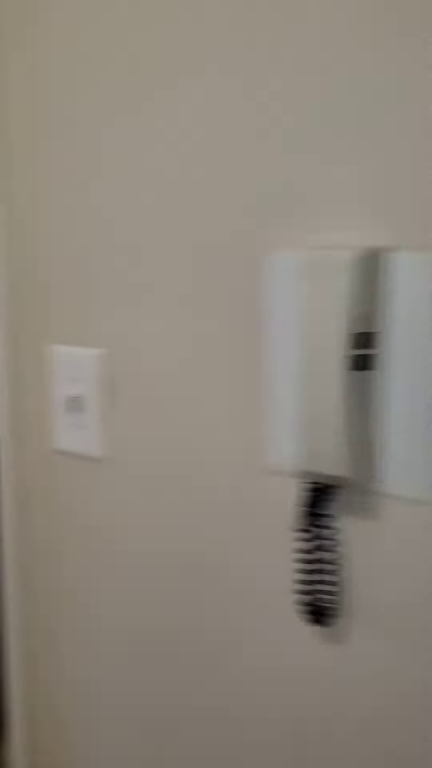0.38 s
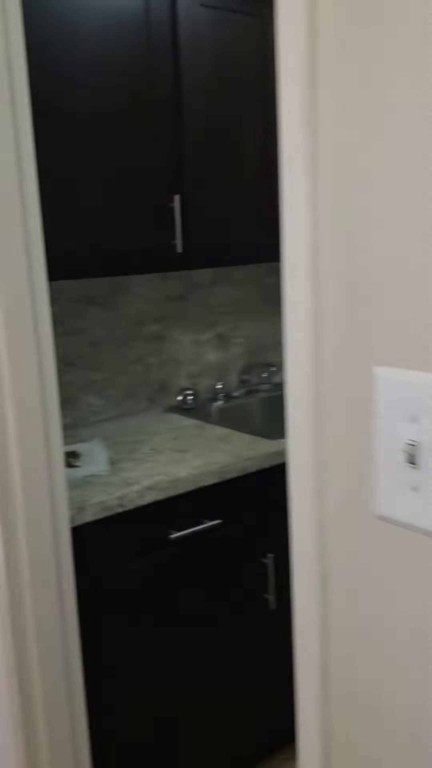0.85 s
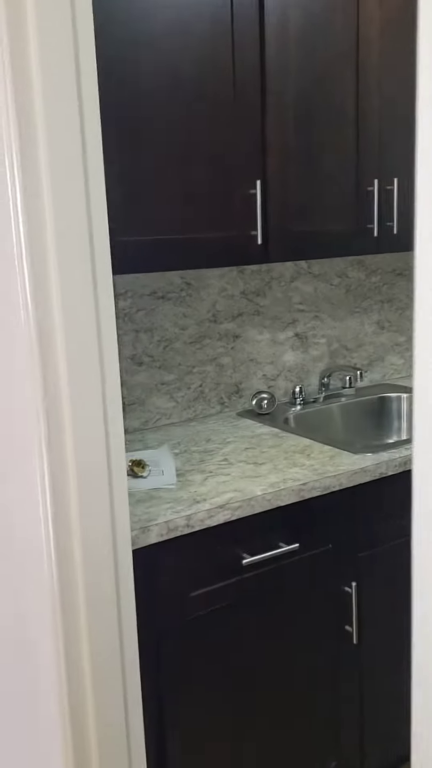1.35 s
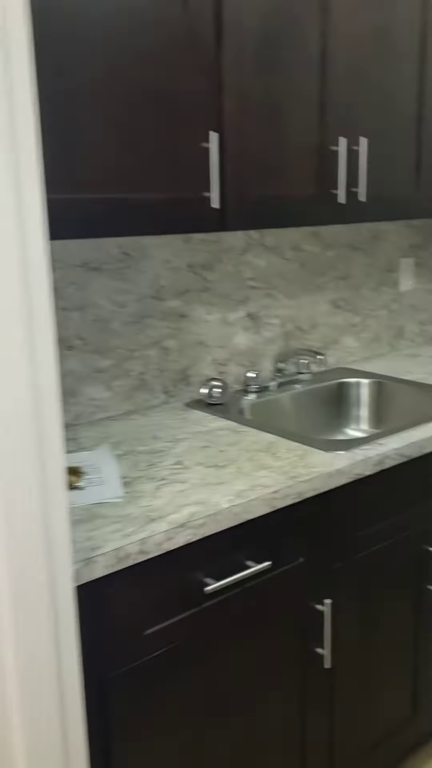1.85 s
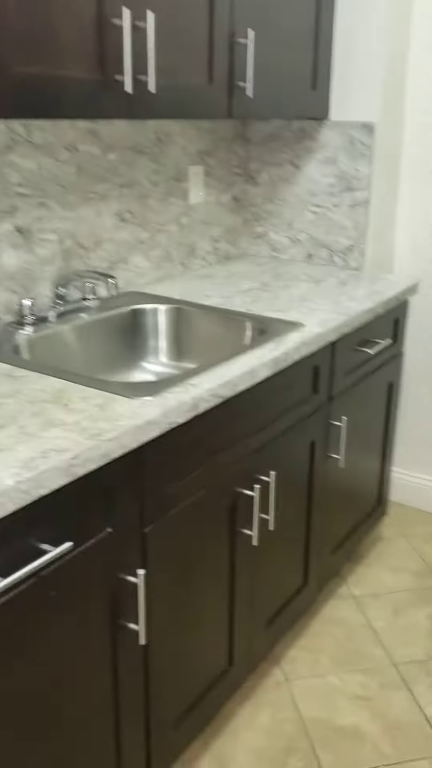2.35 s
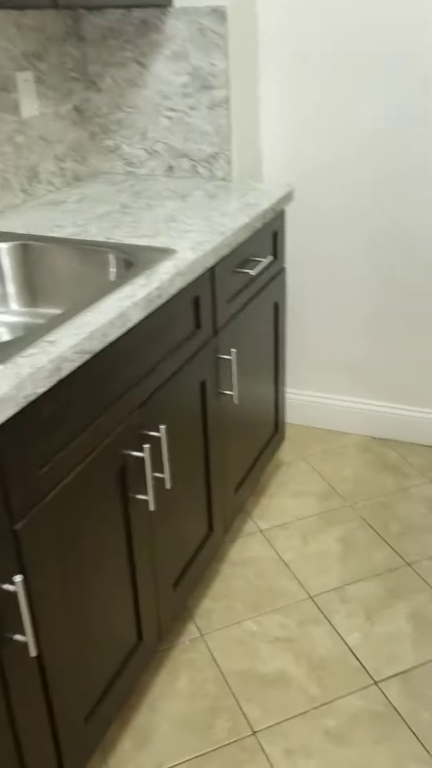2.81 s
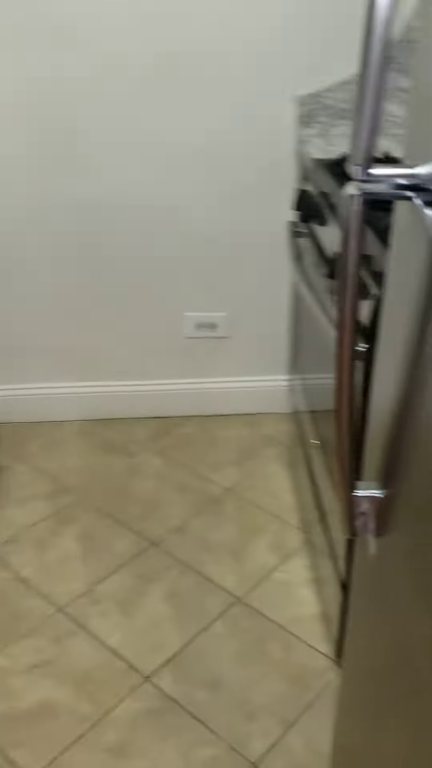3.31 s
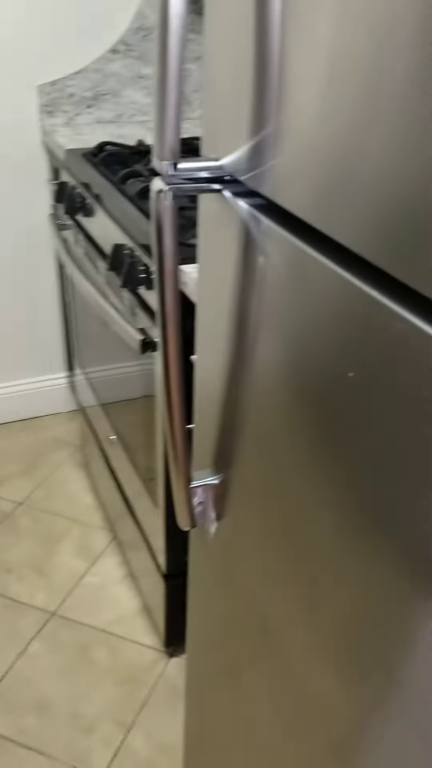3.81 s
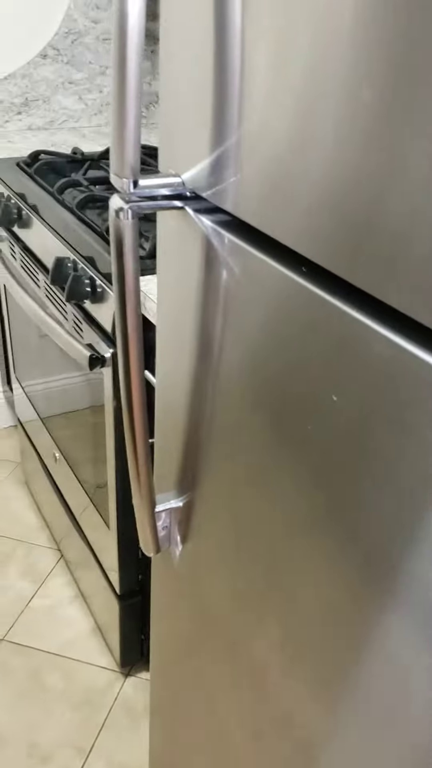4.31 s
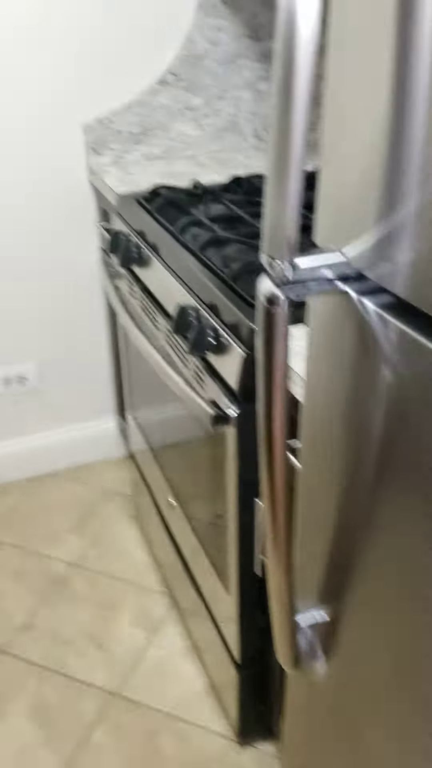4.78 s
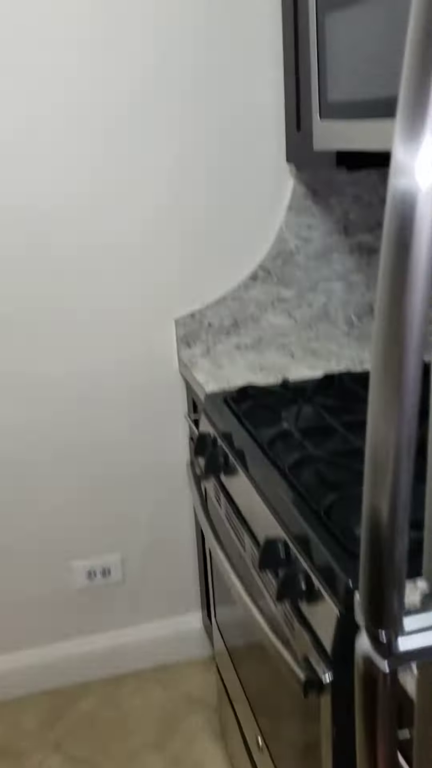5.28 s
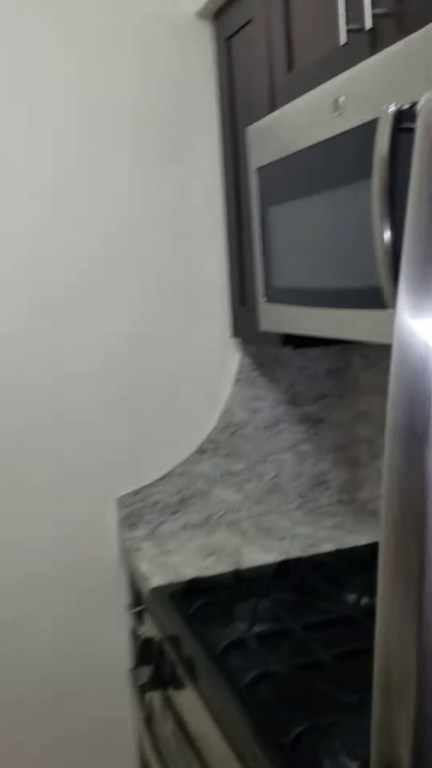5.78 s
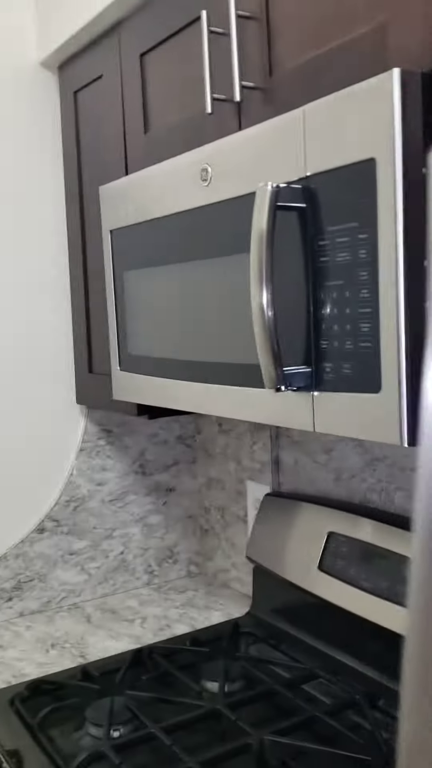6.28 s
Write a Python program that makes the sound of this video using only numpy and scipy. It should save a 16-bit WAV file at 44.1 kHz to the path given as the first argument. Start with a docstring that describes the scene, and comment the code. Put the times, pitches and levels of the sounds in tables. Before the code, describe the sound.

A handheld stereo recorder is carried through a bare, hard-walled flat. From 0 to 1 second there is low room rumble, a fridge hum, airy clothes swishes, faint shoe ticks and one soft heel thump near 0.5. At about 1.1 a metal latch clacks rapidly with a splintery crack; at 1.25 to 1.3 a hollow wooden door slams, by far the loudest event, boomy and sharp, with small rebounds until 1.4. The rooms ring for roughly a second. Between 1.5 and 3.7 the background sinks, with a tiny tick near 1.9, rustles from 2.4 and a soft step at 3.0. From 3.5 the low mains hum and unsteady fan drone swell, strongest around 4 to 5. Muffled heel thumps fall at 4.2, 4.6 and 5.7 amid cloth rustling and scrapes. Faint finger knocks at 4.8 and 6.1 lead to sharp, close, left-sided clicks at 6.3.

```python
"""A hollow closet door latches and thuds shut in a bare, hard-walled flat; the rooms ring for a second.
Metal and panel are dying tones, cracks are noise bursts, and the rooms are fading noise tails.
A walker with a hand-held two-port recorder then steps into the kitchen, where a fridge hums louder:
steady tones, wavering tones and narrow noise. Shoes tick and thump softly as filtered noise and low tones,
clothes rustle as swelling noise, and fingers pop and click on the recorder's case as short rings."""
import sys
import numpy as np
from scipy import signal
from scipy.fft import rfft, irfft, next_fast_len
from scipy.io import wavfile
from scipy.ndimage import uniform_filter1d

SR = 44100
rng = np.random.default_rng(int(sys.argv[2]) if len(sys.argv) > 2 else 0)


def elevation(decibels):
    """Turn decibel levels (scalar or array-like) into linear amplitude ratios."""
    levels = np.asarray(decibels, float)
    return 10 ** (levels / 20)


def waveform_to_disk(signal):
    """Save audio, clipped to [-1, 1], as 16-bit WAV at the path in sys.argv[1]."""
    frames = np.transpose(np.atleast_2d(signal))
    scaled = np.clip(frames, -1, 1) * 32767
    samples = np.round(scaled).astype(np.int16)
    wavfile.write(sys.argv[1], SR, samples)


N = 281799  # length in samples

# Levels in the tables are relative: each layer is scaled again where it is mixed.
# low rumble, middle room air and high rustle, as spectra: pitch_hz, level_db (per Hz)
RUMBLE_SPECTRUM = [(15, -28), (30, -25.5), (62, 2.5), (90, -2.5), (120, -2), (170, -4.5), (230, -6.5),
                   (320, -10.5), (420, -20), (700, -33), (1500, -74.5)]
MIDS_SPECTRUM = [(250, -12.5), (450, 6.5), (700, -0.5), (1000, -10.5), (1600, -5.5), (2300, -14),
                 (3300, -18.5), (5000, -32)]
RUSTLE_SPECTRUM = [(1470, -30.5), (2500, -7.5), (2810, -5.5), (3320, -15.5), (3980, -3), (4740, -7),
                   (5820, 2), (7260, -15.5), (9490, -15.5), (10900, -10.5), (15100, -16), (16000, -22),
                   (16500, -38)]
RUMBLE_DB, MIDS_DB, RUSTLE_DB = -50.5, -65.5, -72.5  # resting levels
# the background sinks after the thud and comes back
LULL_RUMBLE_DB, LULL_MIDS_DB, LULL_RUSTLE_DB = -4.5, -6.5, -4
LULL_FROM_S, LULL_UNTIL_S, RETURN_S = 1.5, 3.74, 0.45
# clothes swishing as the walker turns and strides: middle_s, length_s, lift_db (in full for the rustle)
SWISHES = [(0.122, 0.45, 7.5), (0.66, 1, 8), (2.647, 0.82, 8.5), (3.219, 0.34, 3), (3.722, 0.41, 6),
           (4.27, 0.24, 6.5), (4.655, 0.98, 6.5), (5.05, 0.5, 2), (5.405, 0.47, 9), (5.863, 0.63, 4.5)]
SWISH_IN_MIDS, SWISH_IN_RUMBLE = 0.47, 0.13  # share of a swish's dB that reaches the lower layers

# fridge heard from the walker's path: time_s, hum_db, drone_db
FRIDGE_PATH = [(0.0, -52, -59.5), (0.63, -49, -56), (1.05, -60.5, -64.5), (2.3, -58.5, -80),
               (2.5, -55.5, -59.5), (3.0, -50, -64.5), (3.35, -51, -50.5), (3.6, -49.5, -55),
               (4.0, -43, -48), (4.87, -43.5, -46.5), (5.3, -47, -43.5), (6.0, -48.5, -44),
               (6.39, -46.5, -49)]
# bearing of the fridge as the walker turns: time_s, left_over_right_db
FRIDGE_PAN = [(0, -2.5), (2.5, -1.5), (4.0, -1), (5.1, -5), (5.7, -1.5), (6.39, 4)]
# steady mains tones: pitch_hz, level_db
HUM_TONES = [(120.3, -2.5), (240.6, -19.5), (360.9, -19), (481.2, -41)]
# fan noise in narrow cabinet resonances: pitch_hz, width_hz, level_db
DRONE_BANDS = [(165, 14, -6.5), (235.7, 25, -9), (269.7, 31, -1), (296.6, 3.3, -8), (490, 16, -15)]
# wavering fan tones: pitch_hz, level_db
FAN_TONES = [(236, -8.5), (270.5, -2), (486, -27.5)]

# fingers shifting on the case near the left port: start_s, level_db, snap_db (over the case ring)
FINGERS = [(3.505, -55, -17), (4.806, -44, -34), (4.892, -44.5, -54), (6.103, -50, -38),
           (6.145, -41.5, -30), (6.192, -48, -25), (6.234, -40, -33), (6.275, -46, -35),
           (6.2988, -25.5, 8.5), (6.3041, -31.5, 8), (6.3108, -31.5, 8.5)]
# hollow ring of the case, then the sharp snap of the skin: pitch_hz, level_db, t60_s
CASE_RING = [(325, -3.5, 0.01), (512, 5, 0.015), (720, -1, 0.0087)]
SNAP_RING = [(1000, -5.5, 0.0036), (1790, -3, 0.003), (2940, -2.5, 0.0067), (4650, -3.5, 0.0039),
             (7000, -4, 0.00093), (11000, -11.5, 0.0053)]
CASE_LAG_S = 0.0014  # the shell answers just after the snap

# shoes and floor ticking: start_s, level_db, pitch_hz, width_hz, scrape_s (time to fall 30 dB)
TICKS = [(.258, -56.5, 3150, 1500, 0.0055), (.285, -42, 2320, 7000, 0.031), (0.493, -51, 5470, 202, 0.03),
         (0.587, -44, 5160, 9700, 0.027), (0.7561, -45, 2100, 2450, 0.015),
         (1.041, -50.5, 5600, 1000, 0.0065), (1.927, -41, 11000, 8560, 0.0025),
         (3.079, -58, 600, 502, 0.02), (3.759, -53, 600, 660, 0.18), (4.208, -63, 9700, 5160, 0.12),
         (4.622, -61.5, 8000, 7950, 0.2), (4.69, -50.5, 600, 1620, 0.047),
         (4.777, -47.5, 7000, 8100, 0.0033), (5.289, -52.5, 1860, 940, 0.013),
         (5.433, -46, 11000, 3880, 0.088), (5.745, -56, 6500, 7000, 0.19), (5.78, -57.5, 2200, 900, 0.041)]
# soft heel thumps: start_s, level_db, pitch_hz
STEPS = [(0.486, -40.5, 168), (3.038, -46, 169), (4.169, -40, 172), (4.59, -37, 159), (4.659, -38, 195.5),
         (5.709, -44, 149)]

# how long the rooms ring: pitch_hz, t60_s
ROOM_T60 = [(60, 1.2), (200, 0.82), (500, 1.396), (1000, 1.4), (2000, 1.08), (3100, 1.07), (5000, 0.82),
            (8000, 0.7), (12000, 0.27)]
# tone of the room tails as they begin: pitch_hz, level_db
ROOM_COLOUR = [(40, -19.5), (80, -9.5), (130, -6), (250, -1.5), (400, 5.5), (1000, 2), (3000, 1),
               (6000, -2), (9000, -8.5), (15000, 2)]
# left-right likeness of noise, then of the room tails: pitch_hz, likeness (0 unlike, 1 the same)
NOISE_LIKENESS = [(60, 0.51), (130, 0.67), (290, .8), (640, 0.21), (1400, 0.014), (15000, .01)]
ROOM_LIKENESS = [(60, .8), (130, 1), (290, 0.43), (640, 0.17), (1400, .02), (15000, .01)]
# colour of the left port over the right, for the walker's side, then the door's side: pitch_hz, balance_db
WALKER_PORTS = [(60, 8), (110, 1), (200, 3.5), (380, 2), (700, 3.5), (1290, 6), (2380, 7.5), (4400, -2.5),
                (8120, -7.5), (15000, 2)]
DOOR_PORTS = [(60, -1), (110, 4.5), (200, -0.5), (380, 1), (700, 4.5), (1290, 0.5), (2380, 3.5),
              (4400, -2.5), (8120, -5.5), (15000, -1)]

# wood and frame cracking as they meet: start_s, level_db, rise_s, t60_s
CRACKS = [(1.0946, -31.5, 0.0018, 0.22), (1.256, -47.5, 0.0032, 0.45), (1.261, -27, 0.0029, 0.13),
          (1.2793, -18, 0.00037, 0.036), (1.284, -12.5, .001, 0.024)]
# tone of a crack: pitch_hz, level_db (per Hz)
CRACK_SPECTRUM = [(300, -5), (700, -2.5), (1200, 1.5), (1800, 3.5), (2600, -6), (3150, -1.5), (3600, -9),
                  (5300, -5.5), (6500, -13), (7800, -19.5), (11000, -22.5), (15500, -31.5)]
# latch tongue and strike plate meeting: start_s, level_db, brightness_db
LATCH_HITS = [(1.0944, -12, -26), (1.1003, -12.5, -33.5), (1.1052, -18, -18), (1.111, -14.5, -23),
              (1.117, -22.5, -20.5), (1.2448, -22, 6), (1.2715, -27.5, 7), (1.2802, -11.5, -2.5)]
# rings of the latch, then of its smaller, brighter parts: pitch_hz, level_db, t60_s
LATCH_RING = [(723, -8, 0.016), (2520, -0.5, 0.0094), (2910, -3.5, 0.0022), (3980, -21, 0.0055),
              (5600, -6.5, 0.0025)]
LATCH_BRIGHT_RING = [(7160, -6.5, .0015), (11000, -1.5, 0.0039), (14300, 1.5, .0012)]
# the door still free on its hinges, knocked by the latch and stopped by the frame: pitch_hz, level_db, t60_s
FREE_DOOR_RING = [(80.4, -28, 2.4), (150, -35.5, 0.32), (172, -37, .4), (240, -32, 0.57), (394, -42.5, 0.4),
                  (568, -39.5, 0.51), (737, -41.5, 0.08)]
FREE_FROM_S, FREE_UNTIL_S = 1.096, 1.3
# panel pushed against its frame and springing back: start_s, level_db, contact_ms, direction (1 or -1)
BLOWS = [(1.2652, -10, 4.2, 1), (1.2699, -14, 3, -1), (1.273, -2, 1.996, -1), (1.276, 0.5, 6., 1),
         (1.2913, -10, 4.5, -1), (1.326, -10.5, 3.36, 1), (1.348, -10.5, 3.64, -1), (1.372, -15.5, 2.62, 1)]
# door shut in its frame, with the closet air: pitch_hz, level_db, t60_s
PANEL_RING = [(45, -17.5, 0.54), (55, -12.5, 0.27), (79.6, -9.5, 0.49), (103, 1, 0.09), (119.6, -4.5, 0.24),
              (138.24, -5, 0.72), (159.65, -10, 0.77), (184, -12, 0.45), (207.2, -4, 0.53),
              (241, -7.5, 0.2), (317, -13, 0.32), (360.5, -14, 0.21), (453, -24.5, 0.21), (501, -19, 0.15),
              (600, -16, 0.23), (920, -28, .1)]


def evened(x):
    """Scales to rms 1."""
    return x / np.sqrt(np.mean(x ** 2) + 1e-20)


def read(points, hz):
    """Reads a spectrum on a log-frequency axis."""
    f, value = np.transpose(points)
    return np.interp(np.log(hz + 1), np.log(f + 1), value)


def add(mix, s, sound):
    """Mixes a sound in at time s."""
    part = mix[round(s * SR):][:len(sound)]
    part += sound[:len(part)]


def curves(rows):
    """Turns each dB column into a gain at every sample."""
    s, *columns = np.transpose(rows)
    return [elevation(np.interp(np.arange(N) / SR, s, column)) for column in columns]


def ring(modes, size):
    """Dying tones after one tap; neighbouring tones start in opposite directions."""
    t = np.arange(size) / SR
    out = np.zeros(size)
    for k, (hz, db, t60) in enumerate(modes):
        out += (-1) ** k * elevation(db - 60 * t / t60) * np.sin(2 * np.pi * hz * t)
    return out


def resonate(x, hz, width):
    """A resonance built from two poles around hz, with a gain of about 1 at its peak."""
    pole = np.exp((2j * np.pi * hz - np.pi * width) / SR)
    return 2 * signal.lfilter([1 - abs(pole)], [1, -pole], x).real


def noise(shape_db, size, length, patchy_db, likeness=NOISE_LIKENESS):
    """Two ports of random short-time spectra; shape_db(hz, t) sets the level, drifting patches roughen it."""
    hz = np.fft.rfftfreq(size, 1 / SR)[:, None]
    t = np.arange(4 * length // size + 5) * size / 4 / SR
    a, b, c, d, patches = rng.standard_normal((len(t), len(hz), 5)).T
    patches = uniform_filter1d(uniform_filter1d(patches, size=9, axis=0), size=9, axis=1)
    same = np.clip(read(likeness, hz), -1, 1)
    left = a + 1j * b
    right = same * left + np.sqrt(1 - same ** 2) * (c + 1j * d)
    spectra = np.array([left, right]) * elevation(shape_db(hz, t) + patchy_db * evened(patches))
    sound = signal.istft(spectra, nperseg=size, noverlap=size * 3 // 4)[1]
    return evened(sound[:, :length])


def ports(x, balance):
    """The recorder's body shades each port differently by frequency and direction."""
    size = next_fast_len(N + 4096)
    tilt = read(balance, np.fft.rfftfreq(size, 1 / SR)) / 2  # half to each port
    return irfft(rfft(x, size) * elevation(np.array([tilt, -tilt])), size)[:, :N]


def apart(x):
    """Paths to the two ports differ by a fraction of a millisecond."""
    return np.array([np.roll(x, shift=26), np.roll(x, shift=6)])  # in samples


def air():
    """Rumble, room air and rustle sink together in the lull and lift with each swish."""
    t = np.arange(N) / SR
    lull_times = [LULL_FROM_S, LULL_FROM_S + 0.1, LULL_UNTIL_S, LULL_UNTIL_S + RETURN_S]
    lull = np.interp(t, lull_times, [0, 1, 1, 0])
    swish_db = np.zeros(N)
    for middle, length, db in SWISHES:
        swish_db += db * np.cos(np.pi * np.clip((t - middle) / length, -0.5, 0.5)) ** 2
    rumble = noise(lambda hz, t: read(RUMBLE_SPECTRUM, hz), size=2048, length=N, patchy_db=0.0)
    mids = noise(lambda hz, t: read(MIDS_SPECTRUM, hz), size=1024, length=N, patchy_db=2.0)
    rustle = noise(lambda hz, t: read(RUSTLE_SPECTRUM, hz), size=512, length=N, patchy_db=1.5)
    return (elevation(RUMBLE_DB + LULL_RUMBLE_DB * lull + SWISH_IN_RUMBLE * swish_db) * rumble
            + elevation(MIDS_DB + LULL_MIDS_DB * lull + SWISH_IN_MIDS * swish_db) * mids
            + elevation(RUSTLE_DB + LULL_RUSTLE_DB * lull + swish_db) * rustle)


def fridge():
    """Steady mains tones from the compressor; a fan sings unsteadily, with noise in narrow cabinet resonances."""
    hum_gain, drone_gain = curves(FRIDGE_PATH)
    t = np.arange(N) / SR
    hum = np.zeros((2, N))
    for hz, db in HUM_TONES:
        cycles = hz * t + rng.random((2, 1)) * 0.11  # each port starts at a slightly different point
        hum += elevation(db) * np.sqrt(2) * np.sin(2 * np.pi * cycles)

    shared, own = rng.standard_normal(N), rng.standard_normal((2, N))
    drone = np.zeros((2, N))
    for hz, width, db in DRONE_BANDS:
        band = resonate(resonate(shared + 0.96 * own, hz, width), hz, width)
        drone += elevation(db) * evened(band)

    waver = uniform_filter1d(uniform_filter1d(rng.standard_normal(N), size=2000), size=2000)
    wavering_time = np.cumsum(1 + 0.0119 * evened(waver)) / SR  # pitch strays by about 1.2 % rms
    song = np.zeros(N)
    for hz, db in FAN_TONES:
        song += elevation(db) * np.sqrt(2) * np.sin(2 * np.pi * hz * wavering_time)

    pan_db = np.interp(t, *np.transpose(FRIDGE_PAN)) / 2
    fan = elevation(-6.0) * drone + elevation(-1.0) * song
    return elevation(np.array([pan_db, -pan_db])) * (hum_gain * hum + drone_gain * fan)


def fingers():
    """Skin slips knock the case, heard dry and mostly on the left."""
    out = np.zeros(N)
    for s, db, snap_db in FINGERS:
        add(out, s + CASE_LAG_S, elevation(db) * ring(CASE_RING, size=2000))
        add(out, s, elevation(db + snap_db) * ring(SNAP_RING, size=2000))
    return out * elevation(np.array([[3.0], [-11.0]]))  # left, right


def shoes():
    """Ticks are a click and a scrape of noise in one resonance; thumps are short soft low tones."""
    ticks, thumps, t = np.zeros(N), np.zeros(N), np.arange(8000) / SR
    for s, db, hz, width, scrape in TICKS:
        grit = rng.standard_normal(len(t))
        burst = np.append(3.0, grit[1:]) * elevation(-30 * t / scrape)  # the first sample is the click
        level = np.std(resonate(resonate(grit, hz, width), hz, width))  # evens out the resonances
        add(ticks, s, elevation(db) / level * resonate(resonate(burst, hz, width), hz, width))
    t = t[:4000]
    swell = signal.windows.hann(len(t)) ** 3
    for s, db, hz in STEPS:
        add(thumps, s, elevation(db) * swell * np.sin(2 * np.pi * hz * t))
    return ticks, thumps


def room(x, count=3):
    """Diffuse tails, each band dying at its own speed; successive hits reach different tails, as from other spots."""
    out, turn = np.zeros((2, N)), np.arange(N) / SR * 55
    t_tail = np.arange(2 * SR) / SR
    for k in range(count):
        tail = noise(lambda hz, t: read(ROOM_COLOUR, hz) - 60 * t / read(ROOM_T60, hz), size=512,
                     length=2 * SR, patchy_db=-2, likeness=ROOM_LIKENESS)
        tail *= np.clip(t_tail / 0.0011 - 0.4, 0, 1) / np.sqrt(2 * SR)  # a short wait, then a quick rise
        share = 1
        if count > 1:
            share = np.sqrt(2 / count) * np.cos(np.pi * (turn + k / count))  # squares sum to one
        out += signal.fftconvolve((x * share)[None], tail, axes=1)[:, :N]
    return out


def cracks():
    """Splintery noise bursts, differing between the ports; the walls return smooth clicks of the same colour."""
    out, clicks, t = np.zeros((2, N)), np.zeros(N), np.arange(8192) / SR
    click = np.fft.fftshift(irfft(elevation(read(CRACK_SPECTRUM, np.fft.rfftfreq(256, 1 / SR)))))
    for s, db, rise, t60 in CRACKS:
        shape = elevation(db - 60 * t / t60) * (1 - np.exp(-t / rise))
        grit = noise(lambda hz, t: read(CRACK_SPECTRUM, hz), size=256, length=len(t), patchy_db=-1.6)
        add(out.T, s, (grit * shape).T)
        # the click that feeds the rooms carries the energy of the burst's envelope
        add(clicks, s, click * np.linalg.norm(shape) / np.linalg.norm(click))
    return out, clicks


def latch():
    """Short metal rings, the small parts brighter."""
    out = np.zeros(N)
    for s, db, bright_db in LATCH_HITS:
        bright = elevation(bright_db) * ring(LATCH_BRIGHT_RING, size=2000)
        add(out, s, elevation(db) * (ring(LATCH_RING, size=2000) + bright))
    return out


def free_door():
    """The hanging door hums after the latch knocks it, until the frame stops it."""
    out, t = np.zeros(N), np.arange(round((FREE_UNTIL_S - FREE_FROM_S) * SR)) / SR
    stop = np.clip((t[-1] - t) / 0.0079, 0, 1)  # fades over the last 7.9 ms
    add(out, FREE_FROM_S, ring(FREE_DOOR_RING, size=len(t)) * stop)
    return out


def panel():
    """Smooth pushes ring the panel and shove the air directly; a longer contact is duller."""
    force = np.zeros(N)
    for s, db, ms, direction in BLOWS:
        contact = ms * SR / 1000  # in samples
        u = np.arange(round(contact)) / contact
        # dividing by the contact keeps the push's area the same for any length
        add(force, s, direction * elevation(db) * np.sin(np.pi * u) ** 2 / contact)
    ringing = signal.fftconvolve(force, ring(PANEL_RING, size=2 * SR))[:N]
    return elevation(-3.5) * ringing + elevation(42.0) * force


def scene():
    """Door, steps and fridge in the bare rooms."""
    background = air() + fridge()
    ticks, thumps = shoes()
    walker = apart(elevation(-4.0) * ticks) + thumps + room(elevation(-2.5) * ticks) + fingers()
    crack, clicks = cracks()
    metal = latch()
    wood = panel() + free_door()
    door = apart(elevation(-4.0) * metal + elevation(-5.5) * clicks) + crack + wood
    door += room(elevation(-5.0) * metal)
    door += room(elevation(-7.0) * wood + elevation(-4.5) * clicks, count=1)
    return ports(door, DOOR_PORTS) + ports(walker + background, WALKER_PORTS)


def roll_off(x):
    """The treble ends steeply here."""
    return signal.sosfilt(signal.butter(12, 16820, fs=SR, output="sos"), x)


def record(dry):
    """The recorder drops the deepest bass and rounds off the loudest peaks."""
    heard = signal.lfilter(*signal.butter(2, 30, "high", fs=SR), dry)
    heard = heard / (1 + abs(heard / 0.98) ** 6) ** (1 / 6)  # peaks bend smoothly below 0.98
    return roll_off(heard)


dry = scene()
out = record(dry)
waveform_to_disk(out)
```